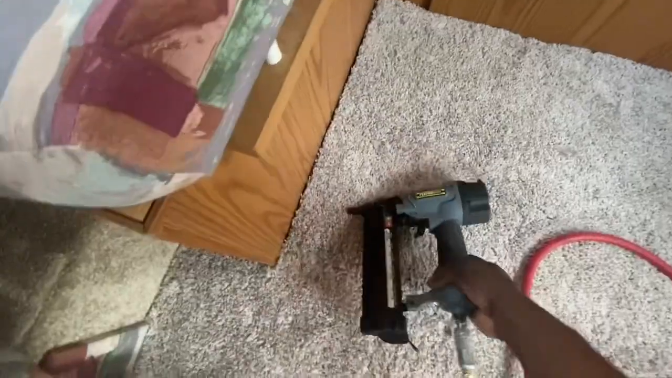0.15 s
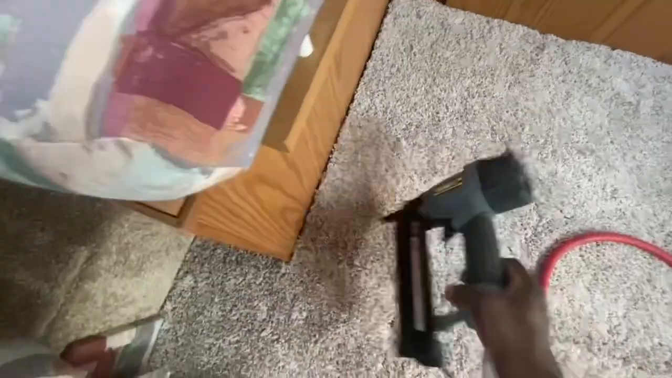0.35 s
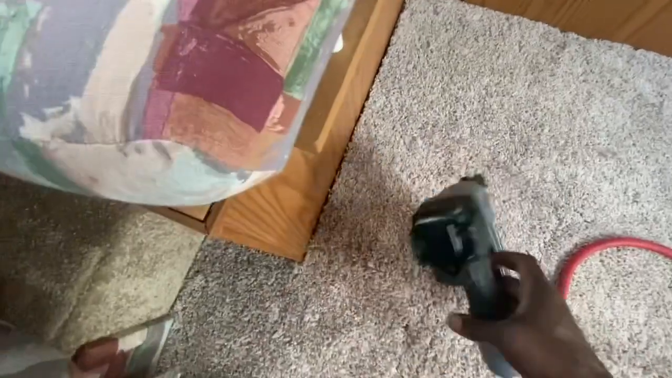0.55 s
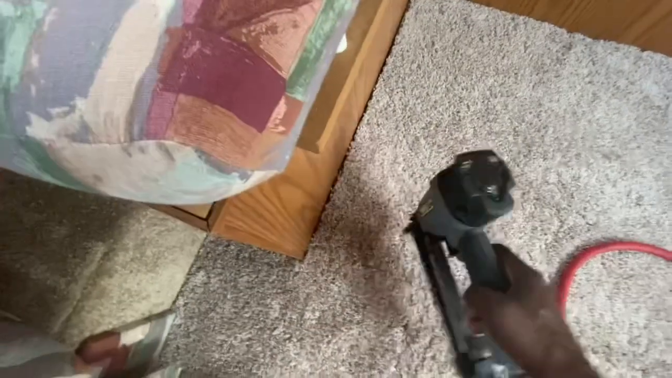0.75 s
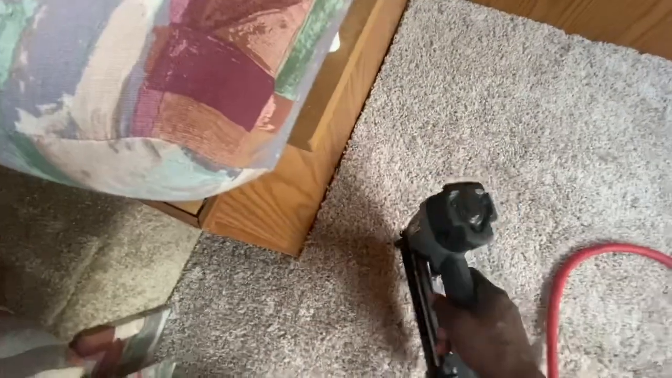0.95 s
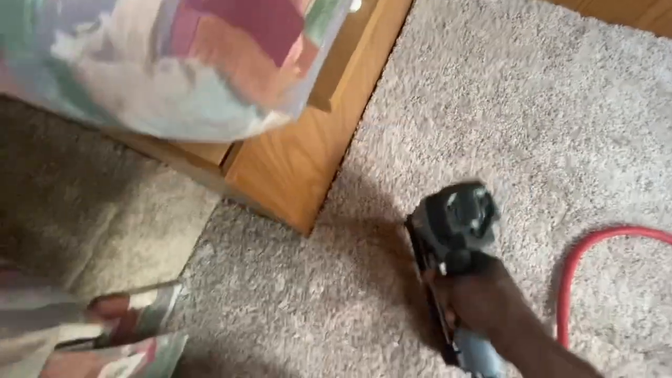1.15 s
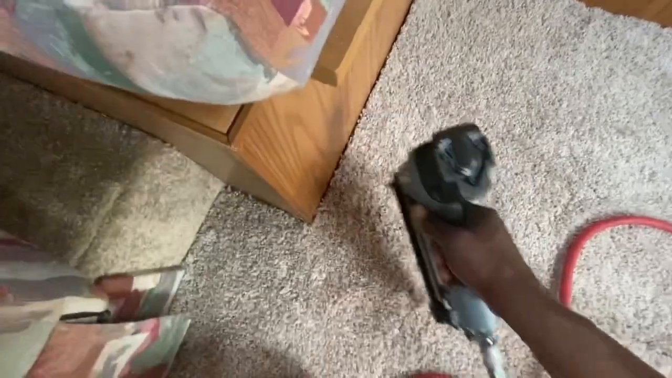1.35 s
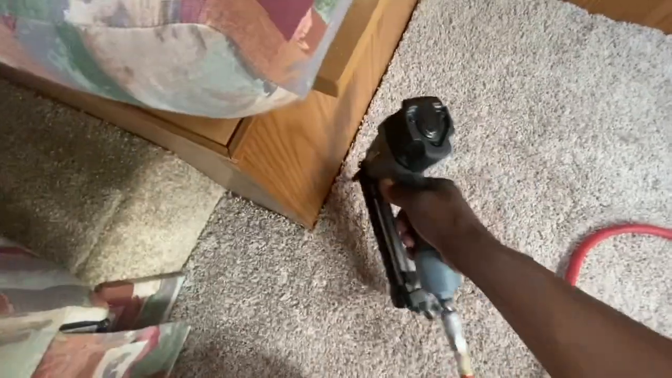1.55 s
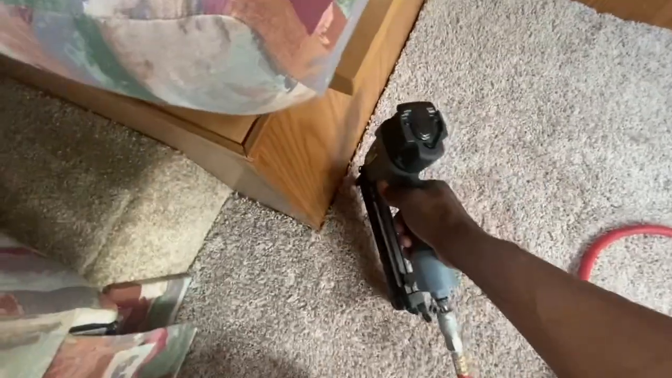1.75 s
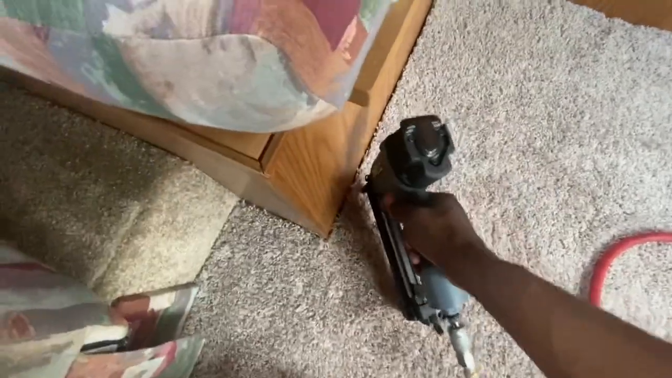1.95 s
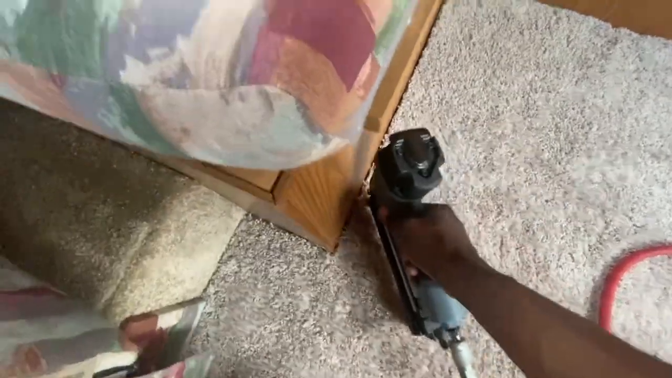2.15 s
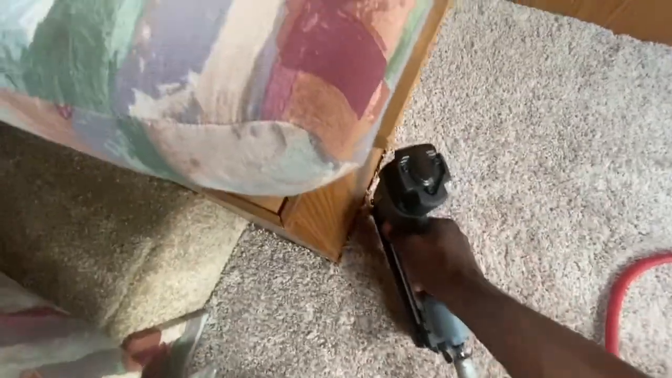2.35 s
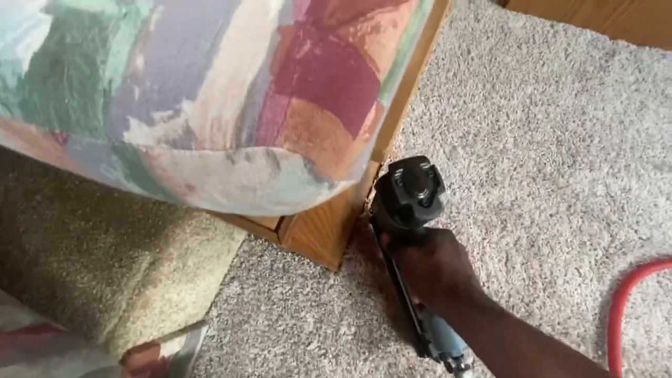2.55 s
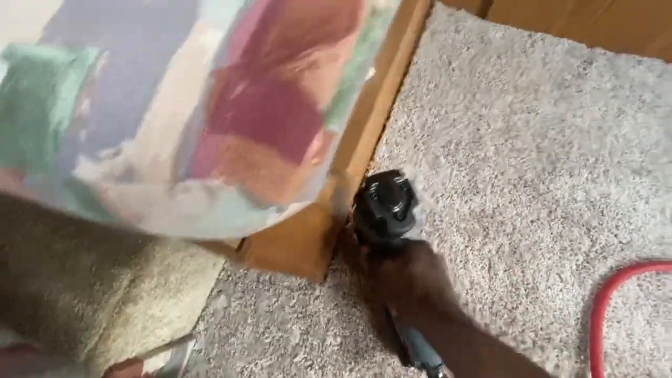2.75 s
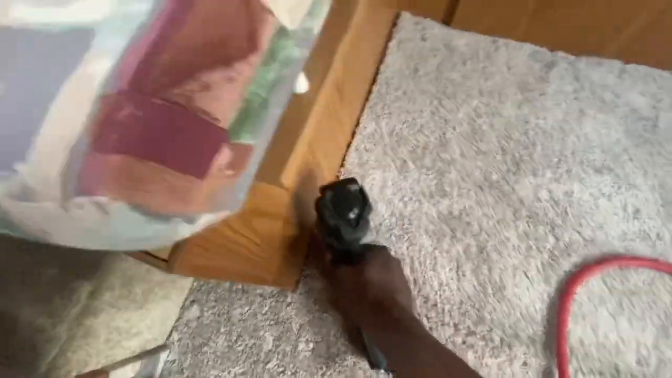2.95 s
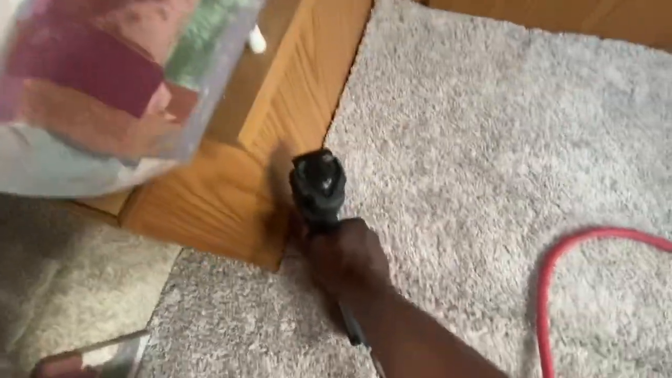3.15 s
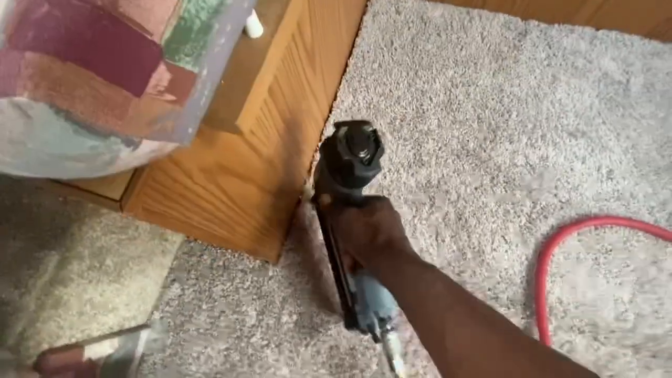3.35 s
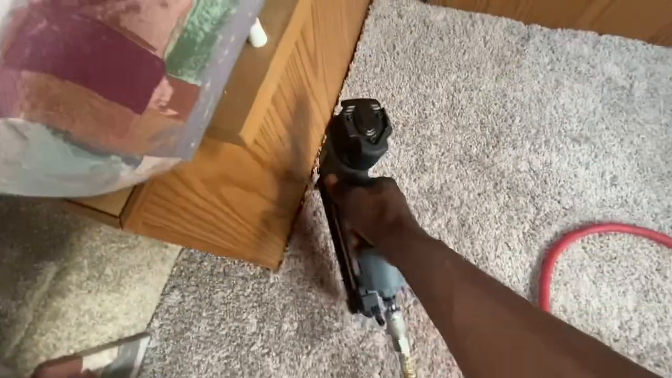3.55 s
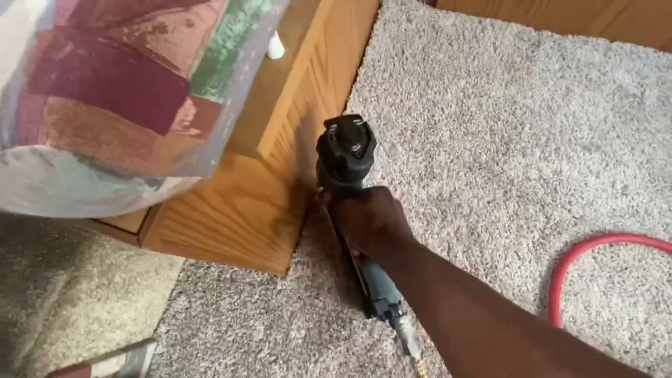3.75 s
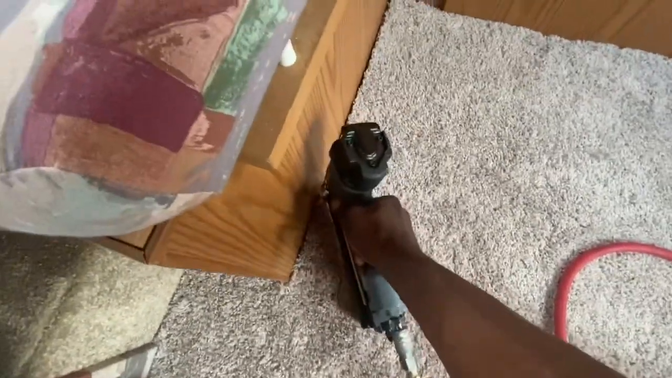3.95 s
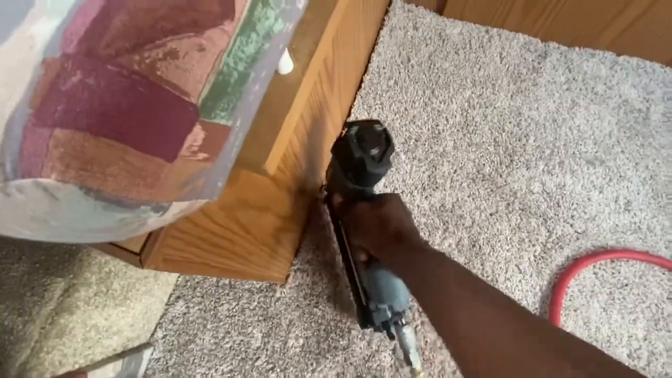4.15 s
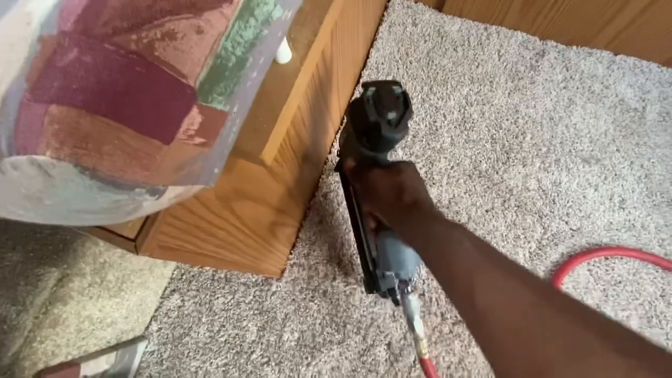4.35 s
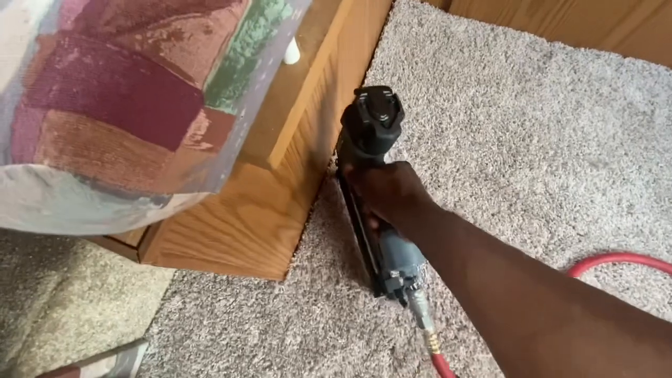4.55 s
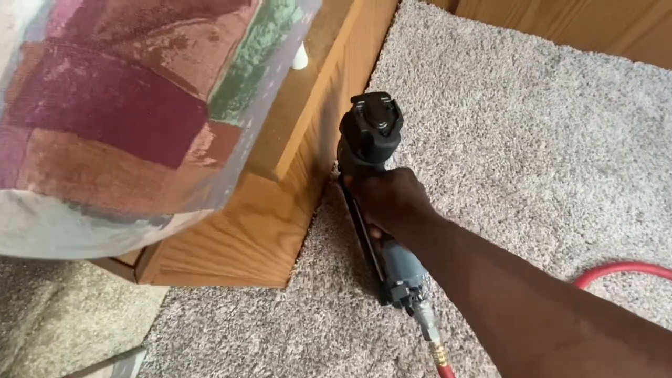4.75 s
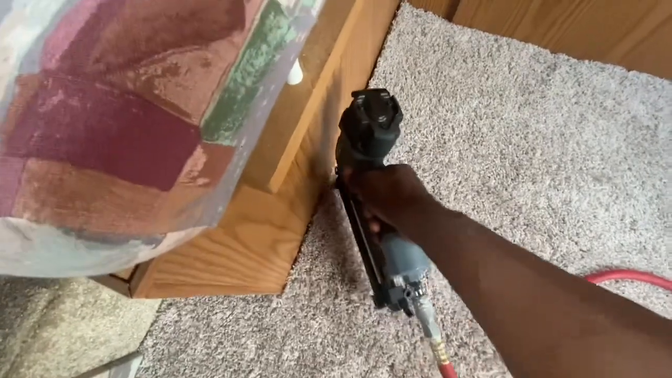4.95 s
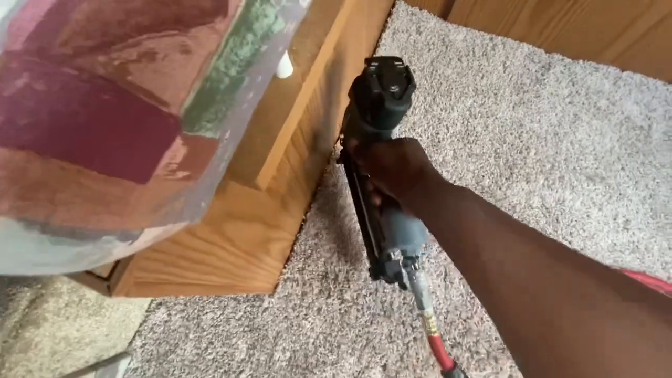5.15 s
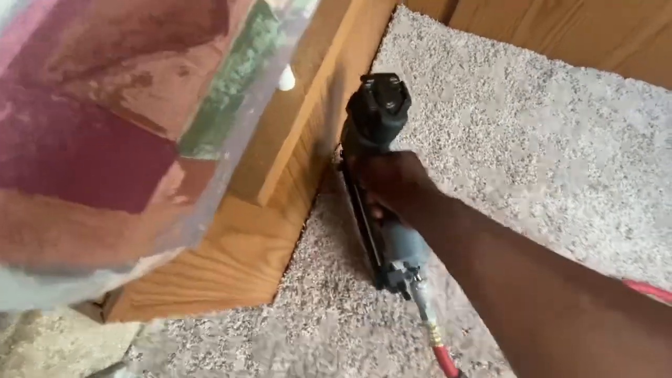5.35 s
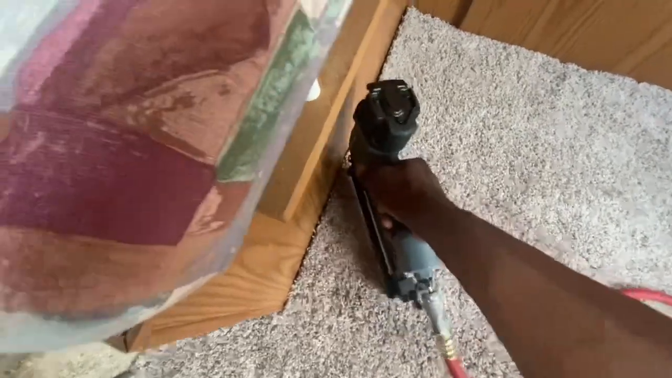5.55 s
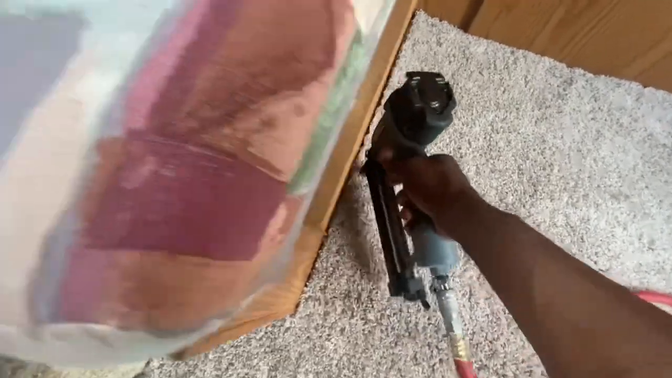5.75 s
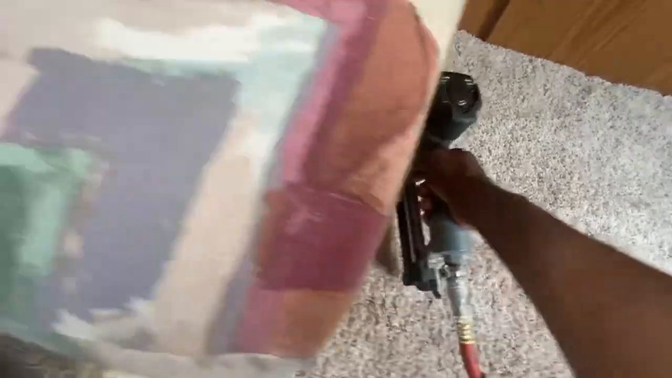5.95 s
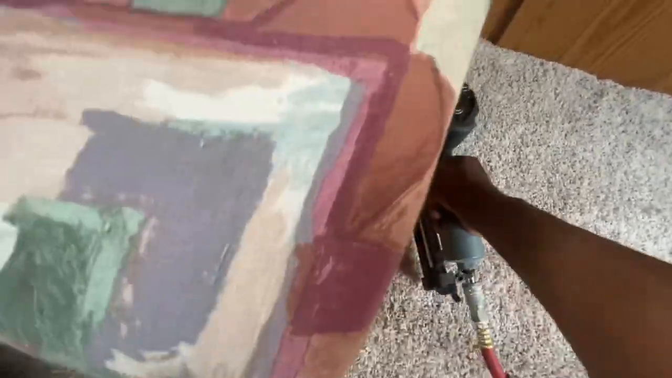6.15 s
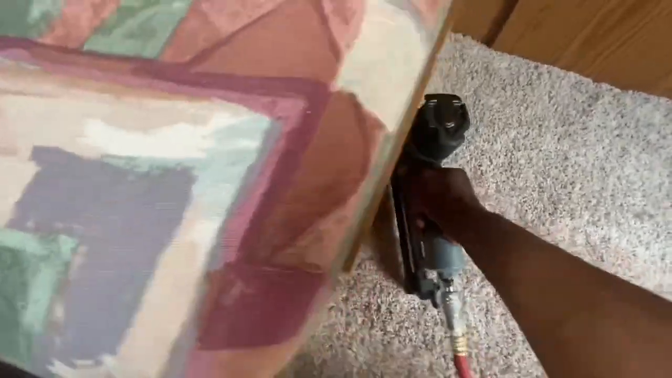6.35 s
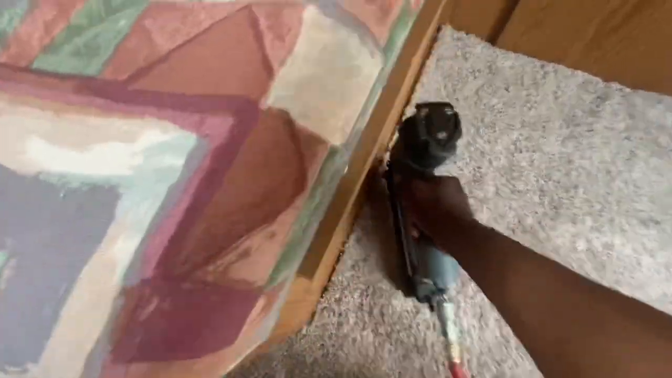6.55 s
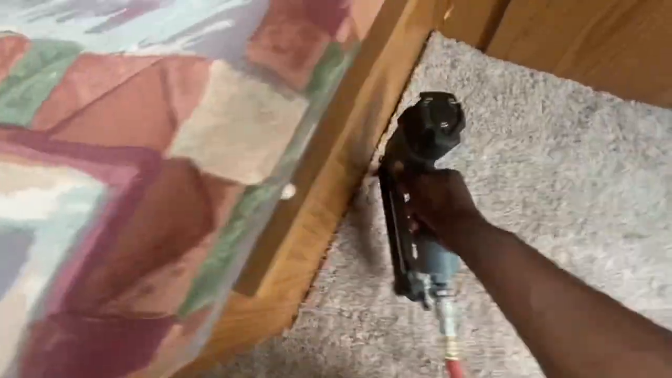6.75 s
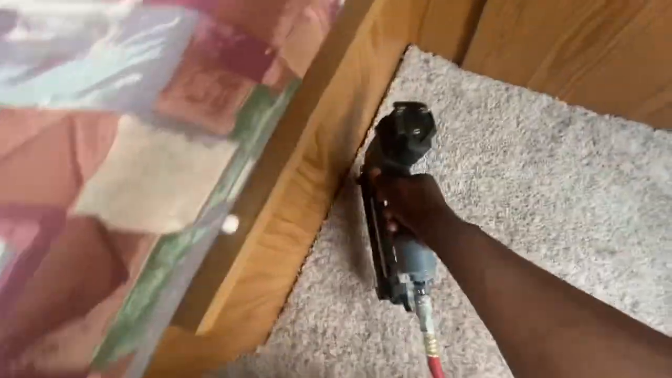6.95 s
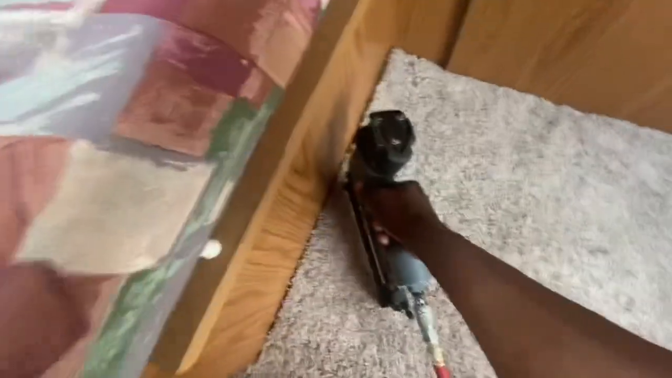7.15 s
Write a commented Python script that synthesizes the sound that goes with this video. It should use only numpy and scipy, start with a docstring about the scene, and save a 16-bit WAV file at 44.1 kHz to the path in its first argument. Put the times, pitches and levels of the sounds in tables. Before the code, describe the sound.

An air stapler clatters onto camper carpet while a bird whistles outside, then fires five hard, snapping shots, each followed by a sharp air blast.

```python
"""An air stapler, set down on carpet in a small camper, fires five staples into the wooden floor.
Pull: valve hiss, then noise bursts and damped modes for the strike. Release: an exhaust blast of
coloured noise, the piston knocking home, trailing air. Contacts click, knock and thud; cloth, hose and
nose rub as swelling noise. Outside, mostly before the shots, a songbird whistles as gliding sines
over a rumble of low noise."""
import sys
import numpy as np
from scipy import signal
from scipy.fft import rfft, irfft, next_fast_len
from scipy.io import wavfile
from scipy.ndimage import map_coordinates

SR = 44100
rng = np.random.default_rng(int(sys.argv[2]) if len(sys.argv) > 2 else 0)


def dump_mix(stems):
    """Bounce the given channels to the path in sys.argv[1] as a 16-bit WAV at rate SR."""
    frames = np.atleast_2d(stems).T  # one column per channel
    limited = np.clip(frames, -1, 1)  # hard clip at full scale
    pcm = np.round(limited * 32767).astype(np.int16)
    wavfile.write(sys.argv[1], SR, pcm)


N = 321048
TIME = np.arange(N) / SR

# Event levels are nominal: each layer adds its own offset. L-R is left over right.
# Low rumble of the surroundings: (time [s], level [dB])
RUMBLE_LEVEL = [(0, -61.5), (.72, -60), (.95, -52.5), (1.5, -57), (2, -54.5), (3.1, -56.5), (3.65, -69),
                (4.6, -80), (6.9, -74.5), (7.28, -63)]
# Falling whistle, before stretch and ratio: (time into note [s], pitch [Hz], level [dB])
FALL_SHAPE = [(0, 3780, -34.5), (.05, 3400, -11.5), (.15, 2990, -5), (.24, 2700, -2.5), (.325, 2550, -6.5),
              (.385, 2280, -4), (.425, 2020, -21)]
# Rising whistle, before stretch and ratio: (time into note [s], pitch [Hz], level [dB])
RISE_SHAPE = [(0, 1395, -25), (.06, 1587, -10.5), (.105, 1810, -1.5), (.135, 2117, 5), (.152, 2758, 0),
              (.166, 3350, 1), (.195, 3650, -12), (.21, 3686, -22)]
# Falling notes: (time [s], time stretch [ratio], pitch [ratio], level [dB])
FALL_NOTES = [(0.103, 1.19, .975, -53.5), (1.056, 1.001, 1.006, -49.5)]
# Rising notes: (time [s], time stretch [ratio], pitch [ratio], level [dB])
RISE_NOTES = [(1.666, 0.93, 0.98, -61), (1.986, 0.96, 0.99, -59), (2.297, 0.94, 0.99, -59),
              (2.598, 0.98, 1.001, -58.5), (2.924, 0.78, 0.93, -61.5)]
# Tool set down and nudged into place:
# (time [s], metal click [dB], knock [dB], knock pitch [Hz], floor thud [dB])
TOOL_BUMPS = [(0.017, -59, -54, 670, -70), (0.097, -58, -52.5, 1790, -76), (.457, -38.5, -42, 6430, -76),
              (.566, -59, -47.5, 1300, -67), (.689, -38, -39.5, 2310, -69), (0.86, -71, -66.5, 800, -40.5),
              (0.889, -28.5, -37, 1960, -29), (.962, -35, -65, 2560, -46), (1.035, -44, -57, 1550, -51),
              (1.063, -30.5, -21, 997, -43), (1.066, -37.5, -22.5, 491, -29.5),
              (1.190, -28.5, -66, 2490, -37), (1.627, -34, -42, 270, -31), (2.075, -49.5, -37.5, 1386, -31),
              (3.642, -54.5, -54, 383, -49)]
# Camper floor booming under weight: (time [s], level [dB])
FLOOR_BOOMS = [(.865, -40), (1.073, -29)]
# Light ticks of loose parts: (time [s], click level [dB])
LOOSE_TICKS = [(1.389, -71), (1.868, -51.5), (1.94, -57), (1.981, -56.5), (2.305, -65), (2.909, -61),
               (3.808, -66.5), (5.359, -62.5), (7.152, -60)]
# Sleeve and hose over the carpet: (peak time [s], rise [s], fall [s], level [dB])
BRUSH_STROKES = [(0, .05, 1, -64.5), (.41, 0.29, .45, -63.5), (.76, .14, 0.062, -62.5),
                 (.92, .08, 0.39, -58), (1.06, 0.16, 0.24, -55.5), (1.9, 0.098, 0.25, -67.5),
                 (2.08, 0.25, 0.069, -70.5)]
# Nose along the trim: (peak time [s], rise [s], fall [s], level [dB])
NOSE_DRAGS = [(6.18, .12, 1.94, -76.5), (7.13, 0.018, 0.18, -54), (7.2, 0.087, 0.19, -56.5)]
# Trigger releases: (time [s], blast length [s], blast [dB], vent whistle [dB], piston knock [dB],
# floor thump [dB], trailing air hold [s], flutter [dB], settling delay [s], L-R [dB])
TRIGGER_RELEASES = [(3.213, 0.089, -15.5, -37, -18.5, -27, 0.21, -48.5, .253, -.5),
                    (4.095, .082, -16, -28.5, -17.5, -28, 0.16, -67.5, 0.27, -1),
                    (4.883, 0.068, -17, -35.5, -17, -38.5, 0.15, -61, 0.24, -1),
                    (5.632, .064, -16, -36.5, -17.5, -39.5, 0.16, -60.5, .217, -1),
                    (6.541, 0.07, -16, -44, -15, -42.5, 0.17, -58.5, .298, -1)]
# Shots: (blow time [s], blow [dB], crack [dB], floor thump [dB], valve lead [s], valve hiss [dB],
# hiss drop over the lead [dB], low piston kick [dB], L-R [dB])
STAPLE_SHOTS = [(3.0715, -11.5, -15.5, -18, .029, -23, 13, -24.5, -1),
                (3.9527, -11, -15, -30.5, 0.026, -30.5, 2, -39.5, -1),
                (4.7663, -9.5, -15, -26.5, 0.027, -32, -2, -48.5, 0),
                (5.4886, -11.5, -15.5, -25.5, 0.028, -40, 3.5, -51.5, -0.5),
                (6.3701, -10.5, -17.5, -24.5, 0.027, -39, 3, -46, -2)]

# Tool ringing on the boards, nominal modes: (frequency [Hz], level [dB], t60 [s])
BODY_MODES = [(328, -14, 0.074), (626, -12.5, 0.095), (837, -3, 0.026), (1027.6, 2, 0.035),
              (1289, -3.5, 0.04), (1528, -5, 0.063), (2023, -15, 0.11), (2350, -6, 0.018),
              (3550, -23.5, 0.024)]
# Hollow floor, nominal modes: (frequency [Hz], level [dB], t60 [s])
BOARD_MODES = [(62, 1.5, 0.052), (90, -10, 0.1), (113.5, 2.5, 0.14), (137, -2.5, 0.082), (194.1, -3, 0.075),
               (240, -13.5, 0.065)]
# Floor right under the nose, nominal modes: (frequency [Hz], level [dB], t60 [s])
RECOIL_MODES = [(129, 3, 0.044), (294, -11.5, 0.16)]

# Exhaust blast spectrum: (frequency [Hz], relative density [dB])
JET_SPECTRUM = [(40, -19), (150, -7.5), (400, -17.5), (1200, -9), (3000, -7.5), (5000, -3.5), (6200, 1.5),
                (7400, -8), (8600, -0.5), (10200, -1), (12500, -1.5), (15500, -8)]
# Trailing air spectrum: (frequency [Hz], relative density [dB])
TRAIL_SPECTRUM = [(60, -20.5), (300, -17.5), (1500, -9), (3000, -8.5), (6000, -2.5), (10200, 1.5),
                  (13000, 4), (15500, -4.5)]
# Piston knock spectrum: (frequency [Hz], relative density [dB])
KNOCK_SPECTRUM = [(40, -26.5), (130, -9), (450, -7.5), (750, 1), (1500, -0.5), (2100, -5), (3500, -18),
                  (6000, -21), (15000, -44)]
# Staple crack spectrum: (frequency [Hz], relative density [dB])
CRACK_SPECTRUM = [(200, -16), (1200, 1), (3000, 2), (6000, -3), (10000, -1), (15500, -13.5)]
# Steel click spectrum: (frequency [Hz], relative density [dB])
CLICK_SPECTRUM = [(200, 1), (1200, -15.5), (2500, 4), (4300, 2.5), (6500, -2), (10000, -1.5),
                  (15500, -21.5)]
# Valve hiss spectrum: (frequency [Hz], relative density [dB])
VALVE_SPECTRUM = [(100, -6.5), (1000, -14), (3000, 0.5), (6000, -5), (10000, 5.5), (14500, 2.5),
                  (16000, -4)]
# Cloth and hose spectrum: (frequency [Hz], relative density [dB])
CLOTH_SPECTRUM = [(200, -1.5), (1000, -0.5), (3000, -1), (6200, -2.5), (7500, -9.5), (10000, -8.5),
                  (15500, -18.5)]
# Nose scrape spectrum: (frequency [Hz], relative density [dB])
SCRAPE_SPECTRUM = [(40, -7), (120, 10), (600, -1), (1500, -9.5), (3000, -25.5), (10000, -35.5),
                   (15500, -42)]
# Rumble spectrum: (frequency [Hz], relative density [dB])
RUMBLE_SPECTRUM = [(20, -18.5), (55, 9.5), (130, 2.5), (200, -1.5), (290, -8.5), (500, -12.5), (800, -29),
                   (2000, -32.5), (5000, -46.5), (15000, -58)]
# Low push of piston and tool: (frequency [Hz], relative density [dB])
PUSH_SPECTRUM = [(25, -14.5), (60, -4.5), (130, 1.5), (200, -9), (310, -7), (450, -16), (900, -37.5),
                 (4000, -69.5)]
# Floor boom spectrum: (frequency [Hz], relative density [dB])
BOOM_SPECTRUM = [(25, -21.5), (55, 4), (85, 1), (140, -9), (210, -18), (400, -38.5), (2000, -80.5)]
# Left-right likeness of noise: (frequency [Hz], correlation [-1..1])
CHANNEL_LIKENESS = [(60, 1), (160, 0.33), (320, 0.099), (1400, 0.16), (3000, 0.04), (15000, 0.092)]
# Camper reverberation: (frequency [Hz], t60 [s])
CAMPER_DECAY = [(80, 0.24), (300, 0.2), (1200, 0.17), (3000, 0.14), (8000, 0.14), (15000, 0.026)]

DRONE_HZ, DRONE_DB = 250, -9.5  # narrow band in the rumble, dB re its wide band
STROKE_DB = 25  # climb over a stroke's rise, drop over its fall
TICK_HZ, TICK_KNOCK_DB, TICK_THUD_DB = 1200, -6.5, 4  # levels re the tick's click
SETTLE_HZ, SETTLE_DB = 400, -58.5  # tool settling once its air is spent
TRAIL_DB = -45  # trailing air at the end of its hold
VENT_HZ = 8570  # faint whistle of the exhaust slots
NOTCH_HZ, NOTCH_WIDTH_HZ, NOTCH_DB = 12300, 520, -20
TOP_HZ = 15750  # band limit


def amp(db):
    """Decibels to gain."""
    return 10 ** (np.asarray(db) / 20)


def unit(x):
    """x at rms 1."""
    return x / np.sqrt(np.mean(x ** 2) + 1e-20)


def along(points, hz):
    """(Hz, value) points read on a log-frequency axis."""
    f, v = np.transpose(points)
    return np.interp(np.log(hz + 1), np.log(f + 1), v)


def level(rows):
    """Gain per sample from (s, dB) rows."""
    return amp(np.interp(TIME, *np.transpose(rows)))


def wobble(rate_hz, size=N):
    """Random curve: Gaussian knots at rate_hz joined by straight lines."""
    knots = rng.standard_normal(size // 8 + 4)
    return map_coordinates(knots, [np.arange(size) * rate_hz / SR], order=1)


def band(hz, octaves):
    """Spectrum of one broad resonance."""
    skirt = ((-6, -40), (-1, -11), (0, 0), (1, -11), (6, -40))
    return [(hz * 2 ** (k * octaves), db) for k, db in skirt]


def noise(spectrum, size=N, ripple_db=3.5):
    """Coloured stereo noise of rms 1, nearly mono in the bass; close surfaces ripple its spectrum."""
    hz = np.fft.rfftfreq(size, 1 / SR)
    turn = np.arccos(np.clip(along(CHANNEL_LIKENESS, hz), -1, 1)) / 2
    ripple = ripple_db * map_coordinates(rng.standard_normal(200), [np.sqrt(hz)], order=1)
    colour = amp(along(spectrum, hz) + ripple)
    white = rfft(rng.standard_normal((2, size)))
    mid, side = irfft(white * colour * [np.cos(turn), np.sin(turn)], size)
    return unit(np.array([mid + side, mid - side]))


def burst(spectrum, rise_s, hold_s, t60_s, swell_db=0):
    """One second of noise that opens, climbs by swell_db (sinks if negative) until hold_s, then decays."""
    t = TIME[:SR]
    opening = 1 - np.exp(-(t / rise_s) ** 2)
    swell = -swell_db * np.maximum(1 - t / hold_s, 0)
    decay = -60 * np.maximum(t - hold_s, 0) / t60_s
    return noise(spectrum, size=SR) * opening * amp(swell + decay)


def ring(modes, rise_s, spread_rad, detune):
    """Damped modes, struck anew; each reaches the two microphones with its own phase."""
    t, out = TIME[:SR], np.zeros((2, SR))
    for hz, db, t60_s in modes:
        pitch_hz = hz * (1 + detune * rng.normal())
        phase = spread_rad * rng.normal() * np.array([[1], [-1]])
        envelope = amp(db + 2 * rng.normal() - 60 * t / t60_s)
        out += envelope * np.sin(2 * np.pi * pitch_hz * t + phase)
    total = np.linalg.norm(amp([mode[1] for mode in modes]))
    return out * (1 - np.exp(-t / rise_s)) / total * np.sqrt(2)


def add(track, time_s, sound, pan_db=0):
    """Mix a sound into the track at time_s; pan_db is left over right."""
    part = track[:, max(round(time_s * SR), 0):][:, :sound.shape[-1]]
    panned = sound * amp([[pan_db / 2], [-pan_db / 2]])
    part += panned[:, :part.shape[1]]


def echoes(x, decay):
    """Diffuse tail of about unit energy per channel; noise decays by the (Hz, t60 s) rows."""
    hz, t, z = signal.stft(rng.standard_normal((2, SR // 2)), SR, nperseg=256)
    fading = z * amp(-60 * t / along(decay, hz)[:, None])
    tail = signal.istft(fading, SR, nperseg=256)[1]
    return signal.fftconvolve(x, tail / np.linalg.norm(tail[0]), axes=1)[:, :N]


def rumble():
    """Low noise of the surroundings with one narrow band standing out."""
    drone = amp(DRONE_DB) * noise(band(DRONE_HZ, octaves=0.34))
    return level(RUMBLE_LEVEL) * (noise(RUMBLE_SPECTRUM, ripple_db=1.5) + drone)


def bird():
    """Two long falling whistles, then five quick, hoarser rising ones: gliding sines blurred by the yard."""
    out = np.zeros((2, N))
    calls = ((FALL_SHAPE, FALL_NOTES, .006, -9), (RISE_SHAPE, RISE_NOTES, .04, 0))
    for shape, notes, waver, blur_db in calls:
        knots_s, hz, db = np.transpose(shape)
        song = np.zeros((2, N))
        for time_s, stretch, ratio, note_db in notes:
            t = TIME[:SR] / stretch
            pitch_hz = ratio * np.interp(t, knots_s, hz) * (1 + waver * wobble(370, size=SR))
            gain = amp(note_db + np.interp(t, knots_s, db) + 1.7 * wobble(70, size=SR))
            gain = gain * (t < knots_s[-1])
            add(song, time_s, gain * np.sin(2 * np.pi * np.cumsum(pitch_hz) / SR), pan_db=1.5)
        out += song + amp(blur_db) * echoes(song, [(2500, 0.17)])
    return out


def strokes(rows):
    """Gain per sample of rubbing strokes, each swelling to a peak and fading; powers add."""
    power = 0
    for peak_s, rise_s, fall_s, db in rows:
        distance = np.maximum((peak_s - TIME) / rise_s, (TIME - peak_s) / fall_s)
        power = power + amp(db - STROKE_DB * distance) ** 2
    return np.sqrt(power)


def thump(soft_hz):
    """The hollow floor gives under the tool; a soft contact leaves its modes above soft_hz quiet."""
    modes = [(hz, db - 10 * np.log10(1 + (hz / soft_hz) ** 4), t60_s) for hz, db, t60_s in BOARD_MODES]
    return ring(modes, rise_s=0.0016, spread_rad=0.24, detune=0.019)


def contact(click_db, knock_db, knock_hz, thud_db):
    """One touch of the tool: steel clicks, the magazine rattles, the housing knocks, the floor thuds."""
    out = np.zeros((2, SR))
    click = burst(CLICK_SPECTRUM, rise_s=0.00019, hold_s=0.0006, t60_s=0.026)
    add(out, 0.0018, amp(click_db + 1.5) * click, pan_db=-3.5)
    rattle = burst(CLICK_SPECTRUM, rise_s=0.0028, hold_s=0.0029, t60_s=0.073)
    add(out, 0, amp(click_db - 7.5) * rattle)
    knock = burst(band(knock_hz, octaves=.9), rise_s=.001, hold_s=.005, t60_s=.05)
    add(out, .001, amp(knock_db) * knock)
    backing = burst(band(250, octaves=0.69), rise_s=0.00054, hold_s=.01, t60_s=0.12)  # carpet backing
    add(out, 0, amp(thud_db - 9.5) * backing, pan_db=-2.5)
    add(out, 0.0033, amp(thud_db + 4.5) * thump(soft_hz=101), pan_db=-4.0)
    return out


def handling():
    """Loose steel ticks and rattles as the tool touches down; cloth, hose and nose rub unevenly."""
    out = np.zeros((2, N))
    for time_s, click_db, knock_db, knock_hz, thud_db in TOOL_BUMPS:
        add(out, time_s, contact(click_db, knock_db, knock_hz, thud_db))
    for time_s, db in FLOOR_BOOMS:
        boom = burst(BOOM_SPECTRUM, rise_s=0.0032, hold_s=0.078, t60_s=.35, swell_db=-8.5)
        add(out, time_s, amp(db) * boom, pan_db=-0.5)
    for time_s, db in LOOSE_TICKS:
        add(out, time_s, contact(db, db + TICK_KNOCK_DB, TICK_HZ, db + TICK_THUD_DB))
    brush = strokes(BRUSH_STROKES) * amp(3.5 * wobble(45)) * noise(CLOTH_SPECTRUM)
    drag = strokes(NOSE_DRAGS) * amp(5.0 * wobble(90)) * noise(SCRAPE_SPECTRUM)
    return out + brush + drag


def eddies():
    """Turbulence makes escaping air slightly lumpy."""
    return amp(1.1 * wobble(200, size=SR) + wobble(900, size=SR))


def releases():
    """The cylinder dumps its air, the piston knocks on its top stop, the last air bleeds away."""
    out, t = np.zeros((2, N)), TIME[:SR]
    for (time_s, length_s, db, whistle_db, knock_db, thump_db,
         hold_s, flutter_db, settle_s, pan_db) in TRIGGER_RELEASES:
        home_s = time_s + length_s
        jet = amp(db) * burst(JET_SPECTRUM, rise_s=0.012, hold_s=length_s, t60_s=0.068, swell_db=1.5)
        vent = burst(band(VENT_HZ, octaves=0.0067), rise_s=.008, hold_s=length_s / 2, t60_s=0.38)
        add(out, time_s, (jet + amp(whistle_db) * vent) * eddies(), pan_db)

        slide = burst(KNOCK_SPECTRUM, rise_s=0.0042, hold_s=length_s, t60_s=0.023, swell_db=26.0)
        add(out, time_s, amp(knock_db - 5.5) * slide, pan_db)  # piston slides up
        knock = burst(KNOCK_SPECTRUM, rise_s=.0005, hold_s=0.0076, t60_s=0.011)
        add(out, home_s, amp(knock_db - 0.5) * knock, pan_db)
        body = ring(BODY_MODES, rise_s=0.0024, spread_rad=0.44, detune=0.017)
        add(out, home_s, amp(knock_db + 5) * body, pan_db)
        buck = burst(PUSH_SPECTRUM, rise_s=0.031, hold_s=length_s, t60_s=0.035, swell_db=5)
        add(out, time_s, amp(thump_db) * buck, pan_db=-2.0)  # tool bucks on the floor

        trail = burst(TRAIL_SPECTRUM, rise_s=.012, hold_s=hold_s, t60_s=0.4, swell_db=-5.5)
        add(out, home_s, amp(TRAIL_DB) * trail, pan_db)
        throb = np.sin(2 * np.pi * 52 * t + .5 * wobble(21, size=SR))  # under the trailing air
        throb_gain = amp(flutter_db + 3.0 - 60 * np.maximum(t - hold_s, 0) / .2)
        add(out, home_s, throb_gain * throb * (1 - np.exp(-t / .04)))
        settling = contact(SETTLE_DB, SETTLE_DB - 3, SETTLE_HZ, SETTLE_DB - 3)
        add(out, home_s + settle_s, settling)
    return out


def shots():
    """The valve spits, the piston runs down, the driver rams the staple home over a few milliseconds."""
    out = np.zeros((2, N))
    for (time_s, db, crack_db, thump_db, lead_s, valve_db,
         drop_db, kick_db, pan_db) in STAPLE_SHOTS:
        spit = burst(VALVE_SPECTRUM, rise_s=0.0022, hold_s=lead_s, t60_s=0.055, swell_db=-drop_db)
        add(out, time_s - lead_s, amp(valve_db) * spit * eddies(), pan_db)
        kick = burst(PUSH_SPECTRUM, rise_s=0.0011, hold_s=0.0051, t60_s=0.031)
        add(out, time_s - lead_s + 0.0058, amp(kick_db) * kick)
        run = burst(band(1700, octaves=2.5), rise_s=0.00028, hold_s=0.014, t60_s=0.034, swell_db=3)
        add(out, time_s - .009, amp(db - 12) * run, pan_db)

        chatter = amp(3.2 * wobble(890, size=SR))  # driver judders against the staple
        crack = burst(CRACK_SPECTRUM, rise_s=0.00033, hold_s=0.0063, t60_s=0.012)
        add(out, time_s - .001, amp(crack_db) * chatter * crack, pan_db)
        knock = burst(KNOCK_SPECTRUM, rise_s=0.0019, hold_s=0.0061, t60_s=0.035)
        add(out, time_s, amp(db + .5) * knock, pan_db)
        body = ring(BODY_MODES, rise_s=0.00064, spread_rad=0.15, detune=0.023)
        add(out, time_s, amp(db + 1.0) * body, pan_db)

        recoil = ring(RECOIL_MODES, rise_s=0.0019, spread_rad=0.21, detune=0.06)  # shoves the floor
        add(out, time_s + .004, amp(thump_db + 9.0) * recoil, pan_db=-5)
        add(out, time_s + 0.0012, amp(thump_db - 10.5) * thump(soft_hz=300), pan_db=-5.5)
    return out


def scene():
    """The tool in the small padded room, the bird outside, the rumble a little to the right."""
    out = np.zeros((2, N))
    add(out, 0, rumble(), pan_db=-1.0)
    tool = handling() + releases() + shots()
    return out + bird() + tool + amp(-13) * echoes(tool, CAMPER_DECAY)


def record(dry):
    """The recorder rounds high peaks, thins deep bass, notches the treble and cuts above TOP_HZ."""
    soft = dry / (1 + np.abs(dry) ** 6) ** (1 / 6)
    soft = signal.sosfilt(signal.butter(2, 30, "high", fs=SR, output="sos"), soft)
    size = next_fast_len(N + SR // 2)
    hz = np.fft.rfftfreq(size, 1 / SR)
    notch = amp(NOTCH_DB * np.exp(-((hz - NOTCH_HZ) / NOTCH_WIDTH_HZ) ** 2))
    edge = 1 / (1 + (hz / TOP_HZ) ** 160)
    return irfft(rfft(soft, size) * notch * edge, size)[:, :N]


dry = scene()
out = record(dry)
dump_mix(out)
```